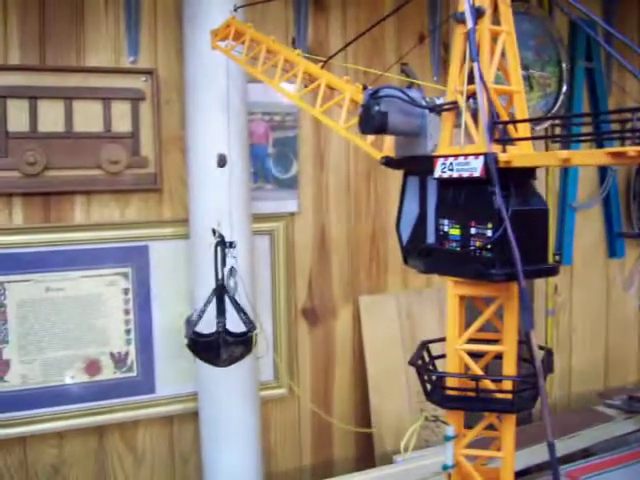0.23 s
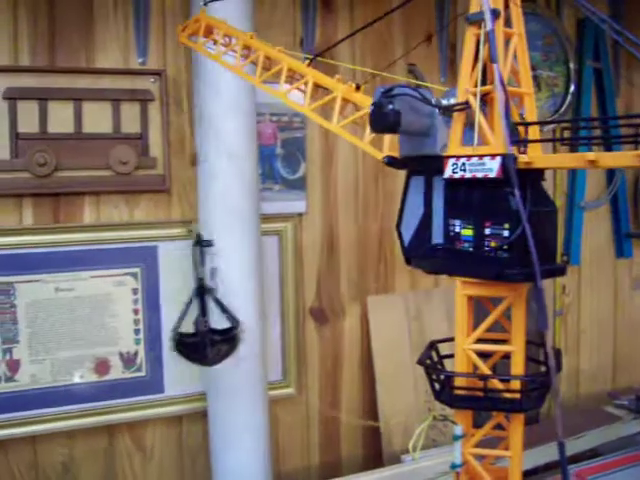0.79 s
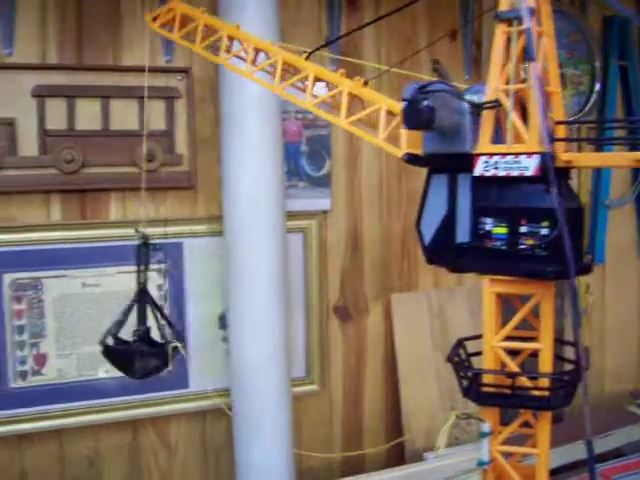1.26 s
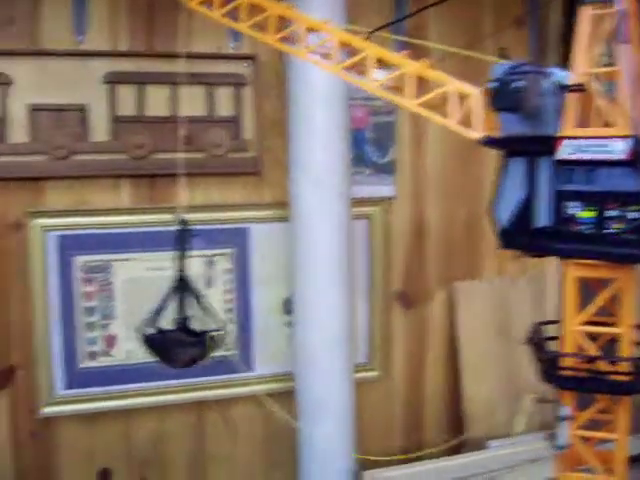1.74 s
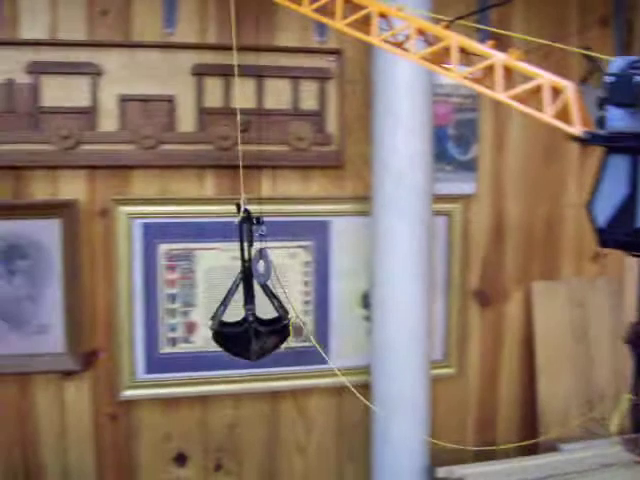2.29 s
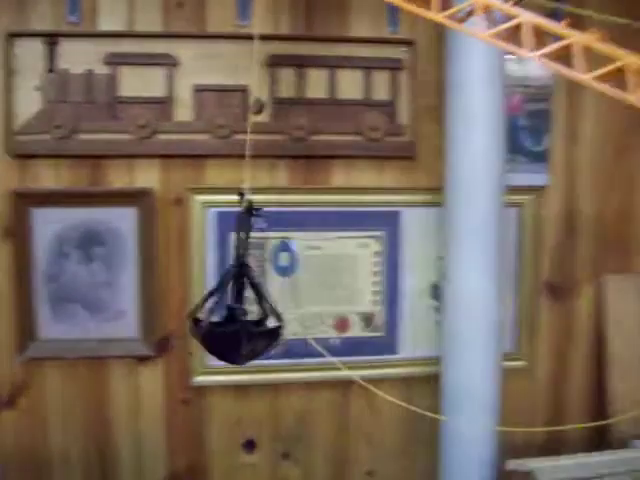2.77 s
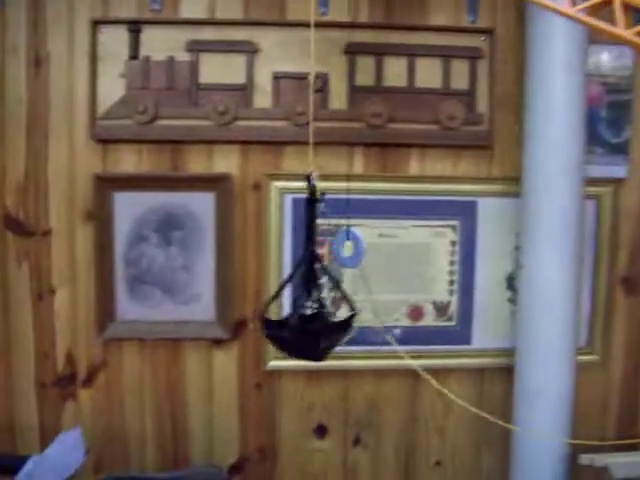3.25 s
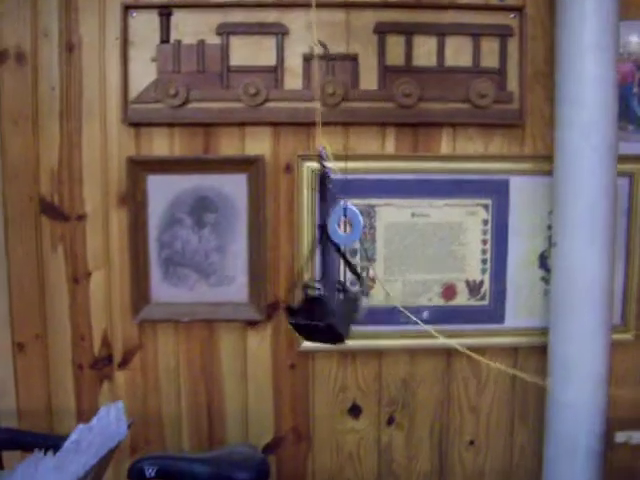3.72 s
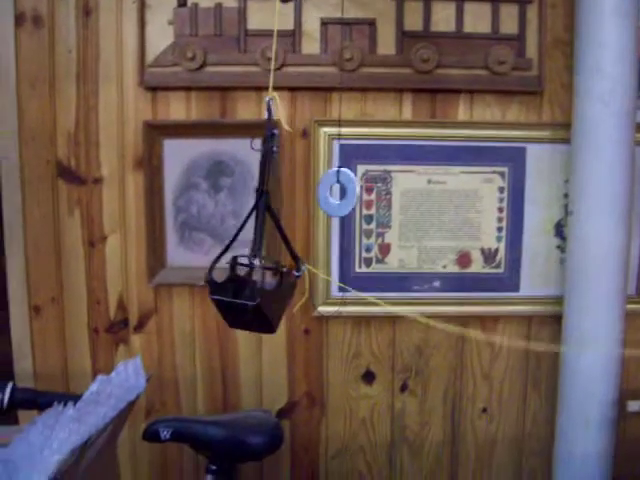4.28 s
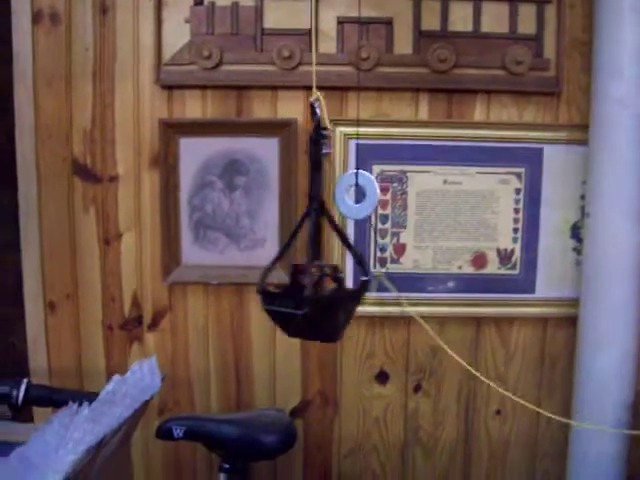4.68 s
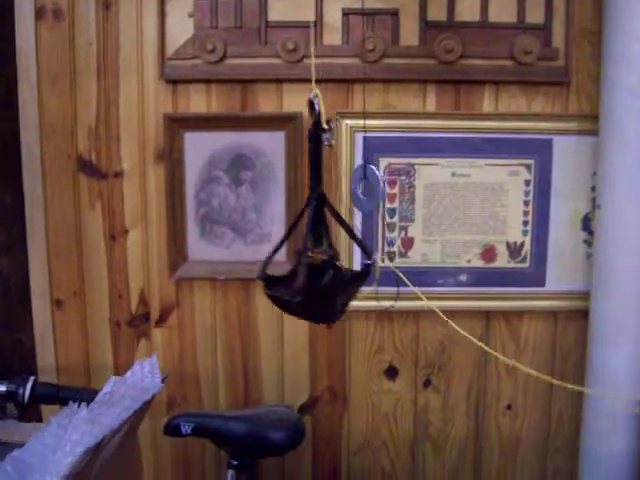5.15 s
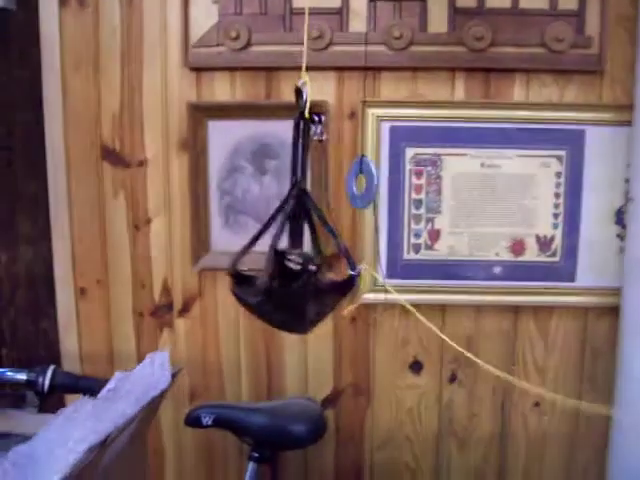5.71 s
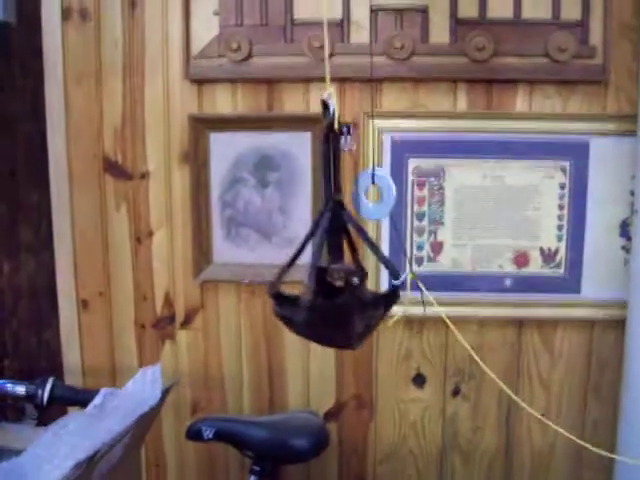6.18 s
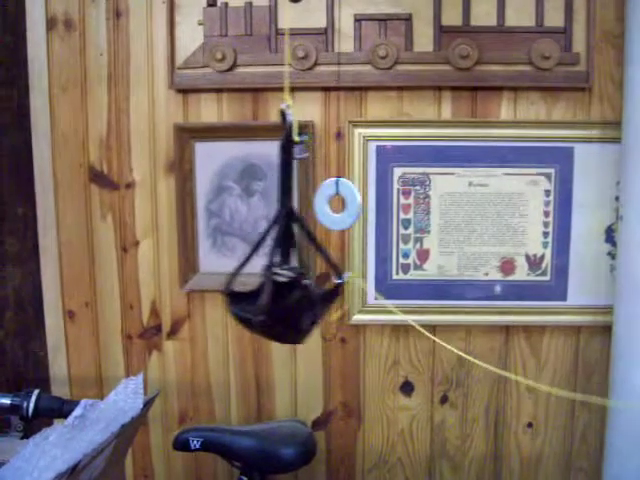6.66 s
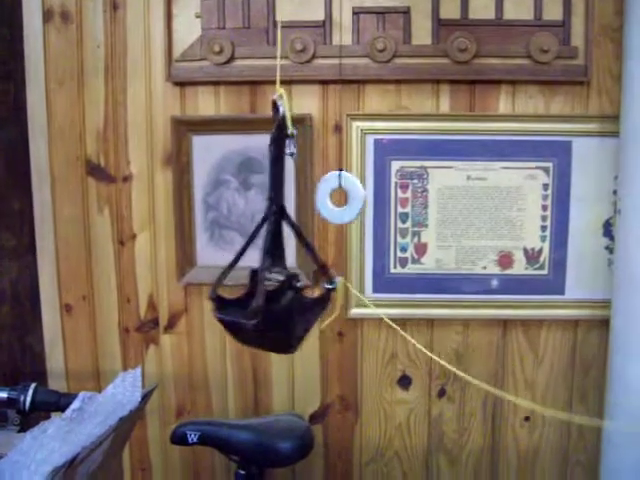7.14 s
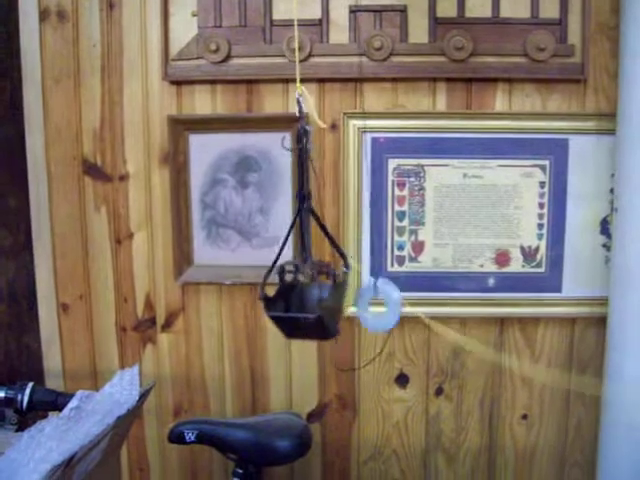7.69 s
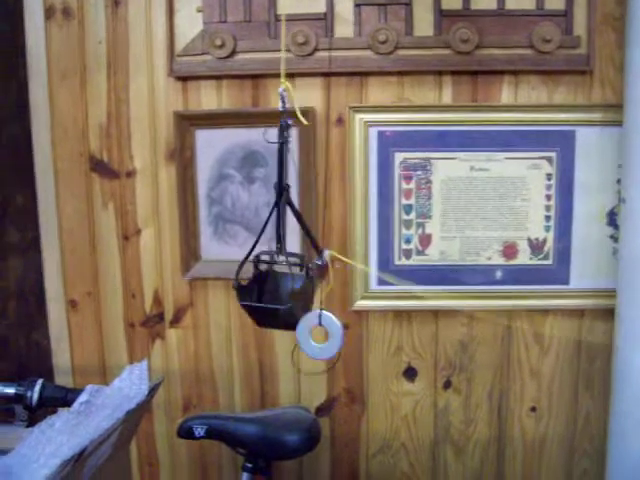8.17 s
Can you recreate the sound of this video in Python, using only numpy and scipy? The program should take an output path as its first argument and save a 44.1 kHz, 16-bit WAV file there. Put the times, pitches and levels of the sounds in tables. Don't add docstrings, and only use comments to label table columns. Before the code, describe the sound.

A plastic toy crane heard near, with short wooden-room echo and dull upper treble. The hoist motor spins up after a switch click, whines unsteadily for about four seconds and runs down in pitch. A quieter gap holds light rasps, dry ticks, thin squeaks and low room noise. Finally a hard click launches a second gearbox, chattering harshly for a second before knocking to a halt.

```python
import sys
import numpy as np
from scipy import signal
from scipy.fft import rfft, irfft, next_fast_len
from scipy.io import wavfile
from scipy.ndimage import uniform_filter1d

SR = 44100
rng = np.random.default_rng(int(sys.argv[2]) if len(sys.argv) > 2 else 0)


def field_ratio(decibels):
    return 10 ** (np.asarray(decibels, dtype=float) / 20)


def master_out(mix):
    frames = np.transpose(np.atleast_2d(mix))
    ceiling = np.clip(frames, -1, 1)
    pcm = np.round(ceiling * 32767).astype(np.int16)
    wavfile.write(sys.argv[1], SR, pcm)


N = 371630
T = np.arange(N) / SR
HZ = np.fft.rfftfreq(next_fast_len(N), 1 / SR)


def unit(x):
    return x / np.sqrt(np.mean(x ** 2) + 1e-20)


def shaped(x, gain):
    size = next_fast_len(N)
    return irfft(rfft(x, size) * gain, size)[..., :N]


def colour(points):
    f, db = np.transpose(points)
    return field_ratio(np.interp(np.log(HZ + 1), np.log(f), db))


def resonances(modes):
    response = np.zeros(len(HZ), complex)
    for k, (f, width, db) in enumerate(modes):
        damping = 1j * HZ * width
        response += (-1) ** k * field_ratio(db) * damping / (f * f - HZ ** 2 + damping)
    return response


def band(lo_hz, hi_hz):
    return 1 / np.sqrt((1 + (lo_hz / (HZ + 1)) ** 12) * (1 + (HZ / hi_hz) ** 12))


def walk(rate):
    count = int(N / SR * rate) + 2
    return np.interp(T * rate, np.arange(count), rng.standard_normal(count)) * 1.2


def wander(db, rate, size=N):
    count = int(size / SR * rate) + 2
    return np.interp(T[:size] * rate, np.arange(count), field_ratio(db * rng.standard_normal(count)))


# f/Hz, level/dB per Hz
AIR_COLOUR = [(12, -53.5), (20, -19), (65, -10.5), (86, -14), (108, -21.5), (285, -16), (488, -20.5),
              (599, -21), (794, -17.5), (974, -16.5), (1710, -22), (1990, -27), (2640, -29.5), (8130, -34),
              (9000, -79.5), (11700, -116), (19800, -120)]
# f/Hz, level/dB
WHISTLES = [(7838, -84), (7897, -84), (8102, -87), (8161, -89)]


def air():
    rattling = 1. * (T > 7.19) * (T < 8.2)
    duck = field_ratio(-7 * uniform_filter1d(rattling, size=SR // 20))
    noise, room = rng.standard_normal(N), colour(AIR_COLOUR)
    hiss = field_ratio(-51) * wander(0.89, 0.33) * unit(shaped(noise, room * band(100, 12000)))
    rumble = field_ratio(-59) * unit(shaped(noise, room * band(15, 140)))

    hum_hz, hum_width_hz = 72.8, 10.35
    hum_db = -54 - 8 * np.clip(T - 5.74, 0, 1.2)
    hum_turns = np.cumsum(hum_hz + hum_width_hz / 4 * walk(12)) / SR
    hum = field_ratio(hum_db) * wander(1, 3.5) * wander(1.1, 9) * np.sin(2 * np.pi * hum_turns)

    whistles = sum(np.sqrt(2) * field_ratio(db) * np.sin(2 * np.pi * f * T) for f, db in WHISTLES)
    return duck * (hiss + rumble) + hum + whistles


# t/s, length/s, start f/Hz, end f/Hz, level/dB
SQUEAKS = [
    (4.988, 0.036, 1014, 990, -49),
    (5.757, 0.011, 199, 199, -40.5),
    (6.379, 0.054, 1940, 2130, -51),
    (6.53, .05, 2450, 2230, -62),
    (6.558, 0.036, 1940, 2050, -54),
    (6.763, 0.14, 2050, 1800, -58),
    (6.962, 0.018, 1940, 1900, -51),
    (6.998, 0.026, 1026, 970, -44),
    (7.185, 0.025, 205, 205, -37),
]


def squeaks():
    out = np.zeros(N)
    for s, length, start_hz, end_hz, db in SQUEAKS:
        n = int(length * SR)
        turns = np.cumsum(np.linspace(start_hz, end_hz, n)) / SR
        out[int(s * SR):][:n] += field_ratio(db) * np.hanning(n) * np.sin(2 * np.pi * turns)
    return out


# t/s, length/s, f/Hz, width/Hz, level/dB
RUBS = [
    (4.25, 0.36, 3350, 350, -46),
    (4.692, 0.17, 3170, 1100, -50.5),
    (4.75, 1, 5170, 900, -59.5),
    (4.8, 0.85, 2050, 150, -63.5),
]


def rubs():
    out = np.zeros(N)
    for s, length, hz, width, db in RUBS:
        friction = rng.standard_normal(N) * wander(1.8, 60)
        rasp = unit(shaped(friction, resonances([(hz, width, 0)]) ** 2))
        swell = np.sin(np.pi * np.clip((T - s) / length, 0, 1) ** 0.43)
        out += field_ratio(db) * swell * rasp
    return out


# t/s, peak level/dB, ring f/Hz, second ring f/Hz, t60/s
TICKS = [(0.0024, -7, 3520, 5380, 0.012), (0.0084, -25.5, 3300, 6160, 0.054),
         (4.7122, -52, 2940, 3760, 0.018), (4.8622, -30.5, 3050, 4270, 0.01),
         (4.8694, -34.5, 3050, 4240, 0.015), (5.3399, -41, 2800, 4300, 0.012),
         (5.737, -48, 3800, 3800, 0.018), (5.838, -42.5, 2800, 4050, 0.019),
         (7.184, -3, 4420, 6350, 0.0095), (7.1901, -21, 4540, 4670, 0.018),
         (7.1931, -26, 4400, 5490, 0.017), (8.1462, -12, 3070, 5720, 0.018)]


def ticks():
    t = np.arange(4000) / SR
    out = np.zeros(N + len(t))
    for s, peak_db, low_hz, high_hz, t60 in TICKS:
        shape = np.minimum(t / .0012, 1) ** 2 * 1000 ** (-t / t60)
        click = 1.1 * np.sin(2 * np.pi * low_hz * t)
        click += 2.3 * np.sin(2 * np.pi * high_hz * t)
        click += 2.16 * rng.standard_normal(len(t))
        out[int(s * SR):][:len(t)] += field_ratio(peak_db - 5) * shape * click
    return shaped(out[:N], band(1840, 7150))


# t/s, shaft rate f/Hz, whine level/dB, upper multiples level/dB
DRUM = [
    (7.18, 80, -49, -58),
    (7.3, 142.2, -58, -52.5),
    (7.44, 191.4, -49, -51),
    (7.56, 204.6, -40, -45.5),
    (7.7, 162.9, -63, -58),
    (7.85, 208.3, -50.5, -56),
    (7.97, 177.5, -52, -58),
    (8.07, 201.6, -48, -59),
    (8.4, 59.75, -60, -70),
]


def drum_whine(turns):
    s, _, whine_db, upper_db = np.transpose(DRUM)
    whine = field_ratio(np.interp(T, s, whine_db, -120, -120)) * wander(3, 30) * np.sin(4 * np.pi * turns)
    upper = field_ratio(np.interp(T, s, upper_db, -120, -120))
    for k, db in ((3, -13), (4, 7), (5, -18.5), (6, 7), (7, -10.5), (8, 0)):
        whine += upper * field_ratio(db) * wander(0.7, 20) * np.sin(2 * np.pi * k * turns)
    return whine


# t/s, level/dB
RATTLE = [
    (7.19, -16.5),
    (7.202, -34.5),
    (7.264, -18),
    (7.348, -21.5),
    (7.97, -23),
    (8.092, -22),
    (8.146, -19.5),
    (8.304, -32.5),
    (8.427, -49),
]
# f/Hz, level/dB per Hz
RATTLE_COLOUR = [(350, -27), (600, -35.5), (988, -16.5), (1640, -19), (1800, -17), (2530, -9.5), (3070, -2),
                 (4260, -4.5), (4770, -0.5), (5170, -9), (5850, -3.5), (6630, -2.5), (7420, -11),
                 (8040, -11), (9000, -30.5), (11700, -52), (19800, -120)]
# f/Hz, width/Hz, level/dB
RATTLE_RINGS = [(2260, 470, -3), (3020, 260, -7.5), (3560, 130, -11), (5100, 510, -29), (5570, 220, 4),
                (6140, 350, -17.5)]
# f/Hz, width/Hz, level/dB
PIN = [(7930, 540, 0)]


def drum():
    s, turns_hz, *_ = np.transpose(DRUM)
    turns = np.cumsum(np.interp(T, s, turns_hz) * (1 + .008 * walk(40))) / SR
    start_s, off_s = 7.205, 8.06
    knocks = np.diff(np.floor(turns), prepend=0) * (T > start_s) * (T < off_s) * wander(2.7, 300)

    halt_s, slowing_s, last_tooth = 8.407, .08, .2
    coasting = halt_s - slowing_s * np.sqrt(np.arange(19) + last_tooth)
    knocks[(coasting * SR).astype(int)] = field_ratio(-5 + 2.5 * rng.standard_normal(len(coasting)))

    burst = signal.lfilter([1], [1, -np.exp(-1 / (0.0061 * SR))], knocks)
    wear = rng.standard_normal(200)[(turns % 1 * 200).astype(int)]
    spikes = field_ratio(1.8 * np.minimum(rng.exponential(size=N), 6))
    teeth = (rng.standard_normal(N) + .45 * wear) * spikes

    ring = colour(RATTLE_COLOUR) * (1 + 0.79 * np.abs(resonances(RATTLE_RINGS)))
    chatter = (burst + .35) * teeth
    high = unit(shaped(chatter, ring * band(1800, 9500)))
    low = unit(shaped(chatter, ring * band(300, 1800)))
    pin = unit(shaped(burst ** 3 * teeth, resonances(PIN) ** 2))
    low_db = -12.5 + 6 * np.exp(-np.maximum(T - start_s, 0) / 0.1)
    level_db = np.interp(T, *np.transpose(RATTLE), -120, -120)
    rattle = field_ratio(level_db - 6) * (high + field_ratio(low_db) * low + field_ratio(-20) * pin)
    return rattle + drum_whine(turns)


HOIST_STOPS_S, UNLOAD_S = 4.75, 4.25
ODD_FADE_HZ = (148, 165.5)
# t/s, shaft rate f/Hz,
# rotor shake level/dB, brush whine level/dB
HOIST = [(.35, 172, -6.5, -2.5), (.5, 163.2, -1, -2), (.6, 169.5, -4, -5.5), (.77, 175.1, -1, -4),
         (.97, 164.2, -0.5, -2.5), (1.05, 167, -2, -3), (1.14, 167.4, -6.5, -1.5), (1.28, 173.6, -2, -4),
         (1.479, 185, 5, 3), (1.82, 172, -3, -3), (2.42, 170.3, -4, -3), (2.62, 178.3, -1.5, -2.5),
         (2.75, 178.2, -6, -4), (3.0, 185.4, -3.5, -2), (3.299, 187, -7, -1.5), (3.52, 193, -3, 0),
         (3.76, 183.4, -7.5, -3.5), (3.88, 182.1, -6.5, -3.5)]


def hoist_speed():
    s, turns_hz, *_ = np.transpose(HOIST)
    gap_hz, spin_up_s, coast_s = 142, .1, .62
    lag = gap_hz * np.maximum(np.exp(-T / spin_up_s) - np.exp(-s[0] / spin_up_s), 0)
    coast = np.exp(-np.maximum(T - s[-1], 0) / coast_s)
    speed = np.maximum(np.interp(T, s, turns_hz) - lag, 40) * coast
    return uniform_filter1d(speed, size=SR // 25) * (1 + 0.00227 * walk(40))


def odd_gain(speed):
    return field_ratio(np.interp(speed, ODD_FADE_HZ, (-10, 0)))


def slack():
    return -10.5 * np.clip((T - UNLOAD_S) / 0.02, 0, 1)


# multiple of its rate, level/dB
CLEAN_ORDERS = [(2, 3), (3, -4.5), (4, -2), (6, 1), (7, 3), (8, -0.5), (10, -4), (12, -1)]
# f/Hz, width/Hz, level/dB
PANELS = [(194, 85, -32.5), (350.7, 48, -30.5), (496.5, 105, -31.5), (680, 18.6, -32.5), (840, 120, -34.5),
          (996, 15.3, -21), (1026, 6, -25), (1100, 36, -26.5), (1190, 30, -27.5), (1208, 34, -20.5),
          (1238, 38, -23.5), (1313, 21.6, -22), (1442, 30, -24), (1537, 31, -24)]


def clean_lines(speed, turn):
    s, _, shake_db, whine_db = np.transpose(HOIST)
    shake_db = np.interp(T, s, shake_db) + np.interp(speed, (80, 90.3), (-25, 0))
    whine_db = np.interp(T, s, whine_db)
    unsteady = np.interp(speed, ODD_FADE_HZ, (1, 0))
    odd, slack_db, panels = odd_gain(speed), slack(), np.abs(resonances(PANELS))
    clean = np.zeros(N)
    for k, db in CLEAN_ORDERS:
        line_db = db + (shake_db if k < 5 else whine_db) + slack_db * (k > 2)
        gain = np.interp(k * speed, HZ, panels) * field_ratio(line_db) * odd ** (k % 2)
        gain *= wander(2.65, 9) * wander(5.2, 22) ** (unsteady * (k > 2))
        clean += gain * np.sin(k * turn + k)
    return clean


# multiple of its rate, level/dB
HOIST_ORDERS = [(1, -3.5), (3, -7), (4, -3), (5, -5), (9, -3), (10, -5.5), (11, -1), (12, -4.5), (13, -6),
                (14, -0.5)]


def shaft_lines(speed, turn):
    end = int(HOIST_STOPS_S * SR)
    speed, rotor = speed[:end], np.exp(1j * turn[:end])
    odd, orders, clean = odd_gain(speed), dict(HOIST_ORDERS), dict(CLEAN_ORDERS)
    lines, spin = np.zeros(N), 1
    for k in range(1, 64):
        spin = spin * rotor * np.exp(2j * np.pi * rng.uniform())
        gain = field_ratio(orders.get(k, -4 * (k % 2))) * wander(2.8 * (1 + k / 40), 5 + k / 5, size=end)
        gain *= np.minimum(speed / 165, 1) ** (max(k - 12, 0) / 4)
        if k > 8 or k not in clean:
            lines[:end] += gain * odd ** (k % 2) * spin.imag * (k * speed < 7000)
    return unit(lines)


# t/s, level/dB
HOUSING = [(0.03, -42), (0.09, -35), (0.52, -29), (0.75, -33), (0.95, -27.5), (1.28, -35), (1.82, -33.5),
           (1.87, -28.5), (2.47, -28), (2.79, -32), (2.82, -30), (3.03, -33.5), (3.55, -29), (4.1, -30.5),
           (4.26, -36.5), (4.47, -37.5), (4.63, -53), (4.75, -47.5)]
# t/s, gear noise over the shaft lines level/dB
LOOSE = [(0, 2), (.25, -6), (.45, -1), (.62, -4), (.8, -8), (.9, -1), (1.15, -3), (1.28, -13), (1.82, -13),
         (1.9, 0), (2.55, -1), (2.8, -4), (3.1, 0), (3.85, -2), (3.95, -5), (4.25, -4), (4.55, 1),
         (4.75, 10)]
# f/Hz, width/Hz, level/dB
HOIST_MODES = [(189.4, 51, -26), (450, 240, -9), (690, 85, -6.5), (881, 260, -6), (1040, 48, 4.5),
               (1187, 51, 6), (1388, 78.5, 5), (1605, 136, -6.5), (1800, 230, -9.5), (2050, 264, -8.5),
               (2413, 234, -6.5), (2576, 74, -4.5), (2852, 168, -7), (3273, 330, -10), (3800, 490, -14),
               (4335, 246, -15.5), (4755, 110, -13.5), (5116, 210, -16), (5677, 163, -13),
               (6202, 210, -15.5), (7230, 900, -26)]
# f/Hz, width/Hz, level/dB
TOWER = [(205, 30, 0)]


def hoist():
    speed = hoist_speed()
    turn = 2 * np.pi * np.cumsum(speed) / SR
    level_db = np.interp(T, *np.transpose(HOUSING)) - 150 * np.maximum(T - HOIST_STOPS_S, 0)
    lines = shaft_lines(speed, turn)
    gear = rng.standard_normal(N) * (1 + .5 * np.cos(turn)) * wander(1.6, 25.55)
    loose_db = np.interp(T, *np.transpose(LOOSE))
    take_up_db = -4.5 * np.clip((0.29 - T) / 0.022, 0, 1)
    body_db = 7 + 0.1 * loose_db + slack() + take_up_db

    # edges f/Hz, level/dB, reach of looseness, roughness/dB
    bands = [((60, 1850), body_db - 6, 1, 3),
             ((1850, 4200), -3, .5, 6),
             ((4200, 9000), -4.5 + .15 * loose_db, .3, 6.5)]
    modes, housing = resonances(HOIST_MODES), np.zeros(N)
    for edges, db, reach, rough_db in bands:
        share = field_ratio(reach * loose_db + rough_db)
        drive = (lines + share * gear) / np.sqrt(1 + share ** 2)
        housing += field_ratio(db) * unit(shaped(drive, modes * band(*edges)))
    tower = field_ratio(body_db - 34) * wander(4.2, 4.2) * unit(shaped(gear, resonances(TOWER) ** 2))

    follow = field_ratio(0.79 * (level_db + 31.5))
    return field_ratio(level_db) * (housing + tower), follow * clean_lines(speed, turn)


def scene():
    housing, clean = hoist()
    crane = housing + drum() + ticks() + squeaks() + rubs()
    room_t60_s, room_db = .3, -9
    t = T[:SR // 2]
    echo = rng.standard_normal(len(t)) * 1000 ** (-t / room_t60_s) * (t > .004)
    wet = signal.fftconvolve(crane, echo / np.sqrt(np.sum(echo ** 2)))[:N]
    return (crane + clean + field_ratio(room_db) * wet + air())[None]


def roll_off(x):
    return signal.sosfilt(signal.butter(12, 9430, fs=SR, output="sos"), x)


def record(dry):
    rounded = .7 * np.tanh(dry / .7)
    response = colour([(20, 5.5), (8000, -4), (8600, -7.5), (9000, -18.0), (9400, -51)])
    return roll_off(shaped(rounded, response))


dry = scene()
out = record(dry)
master_out(out)
```